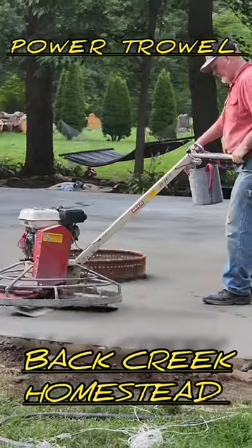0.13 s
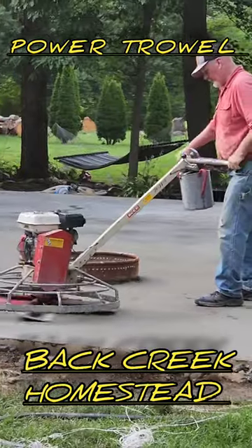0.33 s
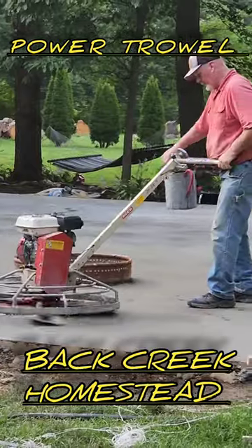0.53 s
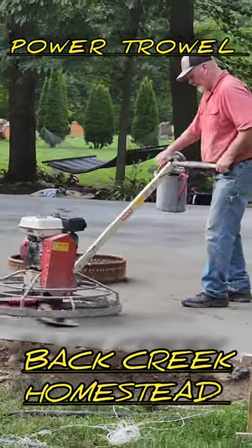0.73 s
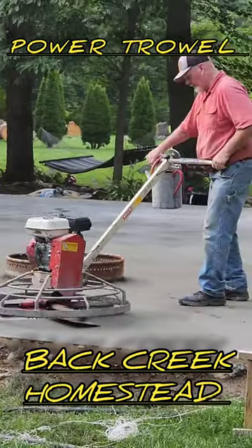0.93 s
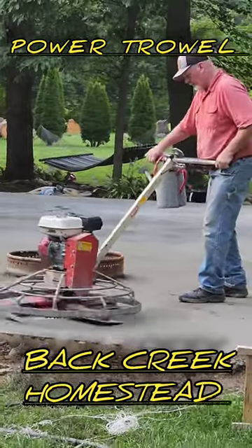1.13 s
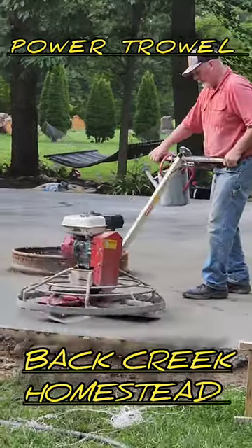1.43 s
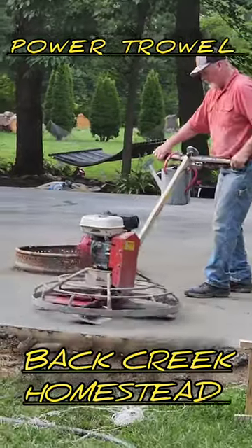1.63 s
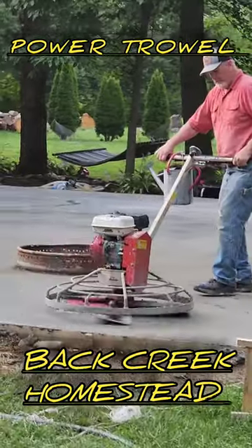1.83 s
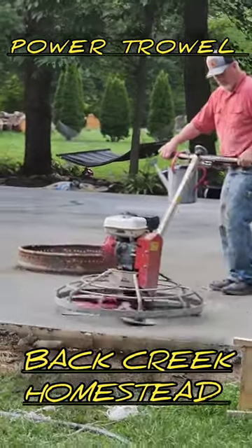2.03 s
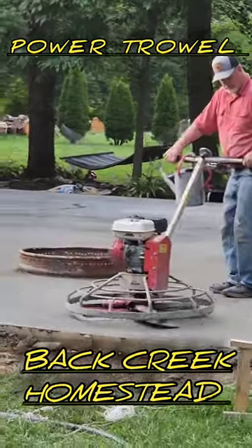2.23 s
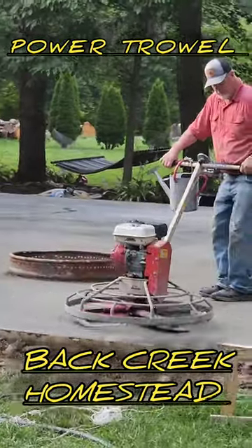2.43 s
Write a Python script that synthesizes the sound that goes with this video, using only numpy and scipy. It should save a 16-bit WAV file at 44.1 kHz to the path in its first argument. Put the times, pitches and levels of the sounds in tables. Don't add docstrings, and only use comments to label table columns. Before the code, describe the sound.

A one-cylinder petrol engine drones loudly and steadily a few metres away outdoors, its muffler tone shifting as the machine turns; steel blades rasp over wet concrete with gritty crackle and scattered clanks, on a nearly overloaded phone microphone.

```python
import sys
import numpy as np
from scipy import signal
from scipy.fft import rfft, irfft
from scipy.io import wavfile
from scipy.ndimage import uniform_filter1d

SR = 44100
rng = np.random.default_rng(int(sys.argv[2]) if len(sys.argv) > 2 else 0)


def invert_db(level):
    return 10 ** (np.asarray(level, dtype=float) / 20)


def generate_wav(signal):
    frames = np.transpose(np.atleast_2d(signal))
    scaled = np.clip(frames, -1, 1) * 32767
    pcm = np.round(scaled).astype(np.int16)
    wavfile.write(sys.argv[1], SR, pcm)


N = 114219
T = np.arange(N) / SR

# start_s, firing_rate_hz, muffler_turned_away (0-1)
ENGINE = [
    (.07, 31.4, .02),
    (.3, 31.42, .02),
    (.47, 31.75, .05),
    (.6, 31.6, .1),
    (1.25, 31.55, .55),
    (1.4, 31.32, .7),
    (1.8, 31.15, .97),
    (2.59, 31.02, .98),
]


def evened(x):
    return x / np.sqrt(np.mean(x ** 2) + 1e-20)


def read(points, hz):
    f, value = np.transpose(points)
    return np.interp(np.log(hz + 1), np.log(f + 1), value)


def curve(table, t, axis=1):
    return np.interp(t, np.array(table)[:, 0], np.array(table)[:, axis])


def turns():
    first_turn = .703
    return first_turn + np.cumsum(curve(ENGINE, T)) / SR


def exhaust():
    exhaust_db, uneven_db, jitter_cycles = -12, .85, .002
    # harmonic_number, level_db
    facing = [(1, -15), (2, -8), (3, -14), (4, -12), (5, -1), (6, 0), (7, -12), (8, -4), (9, -7), (10, -8),
              (11, -10), (12, -19), (13, -22), (14, -18), (15, -22), (16, -23)]
    # harmonic_number, level_db
    turned = [(1, -20), (2, -12), (3, -17), (4, -20), (5, 0), (6, -7), (7, -15), (8, -7), (9, -7),
              (10, -16), (11, -14), (12, -18), (13, -28), (14, -22), (15, -21), (16, -23)]
    muffler_echoes = [
        [(-1., .292), (.57, .581)],
        [(-1.05, .292), (.62, .581)],
    ]

    at = np.flatnonzero(np.diff(np.floor(turns())) > 0)
    chance = rng.standard_normal((len(at), 2))
    late = (jitter_cycles * SR / 31.4 * chance[:, 0]).astype(int)
    blows = np.zeros(N + 8192)
    blows[at + late] = -invert_db(uneven_db * chance[:, 1])
    spectrum = rfft(blows)
    hz = np.fft.rfftfreq(len(blows), 1 / SR)

    away = np.clip(curve(ENGINE, T, axis=2), 0, 1)
    rates = (ENGINE[3][1], ENGINE[6][1])
    out = 0
    for share, table, rate, echoes in zip((1 - away, away), (facing, turned), rates, muffler_echoes):
        k, db = np.transpose(table)
        n = hz / rate
        shape = np.interp(n, k, db)
        shape = shape - 30 * np.log2(np.maximum(n / k[-1], 1))
        shape = shape + 12 * np.log2(np.clip(n, .05, 1))
        echo = 1 + sum(g * np.exp(-2j * np.pi * n * d) for g, d in echoes)
        phase = np.exp(1j * np.angle(echo))
        heard = irfft(spectrum * invert_db(shape) * phase, len(blows))[:N]
        out = out + share * evened(heard)
    return invert_db(exhaust_db) * evened(out)


def pressure(t):
    rise_s = 0.0094
    # start_s, pressure_db
    lean = [(.07, 0.5), (.5, -2.5), (.9, 1), (1.4, -0.46), (1.75, -0.5), (2.2, 0.7), (2.58, 4)]
    # start_s, surge_db, fade_s
    catches = [(.163, 17, 0.0075), (0.247, 7.5, 0.055), (0.389, 7, 0.039), (.688, 3.5, .04),
               (.775, 8, 0.0077), (.8, 2.5, 0.07), (.92, 3, 0.045), (1.07, 2.5, 0.14), (1.262, 5.5, 0.018),
               (1.371, 9, 0.028), (1.42, 2.5, 0.12), (1.501, 3, 0.12), (1.685, 1.5, 0.07), (1.79, 5, 0.084),
               (1.905, 3.5, 0.15), (2.031, 3, .05), (2.25, 3, .02), (2.35, 2, 0.037), (2.45, 1, 0.02),
               (2.55, -2.5, .03)]
    out = curve(lean, t)
    for s, db, fade in catches:
        since = np.maximum(t - s, 0)
        out = out + db * np.minimum(since / rise_s, 1) * np.exp(-(since / fade) ** 2)
    return out


def colour(hz):
    # pitch_hz, level_db (per Hz)
    scrape = [(30, -20), (165, -17), (600, -18.5), (1010, -23.5), (2830, -22), (4800, -28.5), (6500, -36.5),
              (16000, -31)]
    # pitch_hz, width_hz, level_db
    rings = [(454, 150, -2.5), (704, 230, 5), (1060, 85, -1.5), (1232, 220, 5.5), (1615, 260, 6.5),
             (2226, 240, 5), (2780, 150, -5), (4330, 770, 12.5), (7360, 550, 7), (10170, 1200, 2),
             (12400, 1200, 3.5), (15400, 590, 2)]
    return read(scrape, hz) + sum(db / (1 + (2 * (hz - f) / w) ** 2) for f, w, db in rings)


def causal(db):
    c = irfft(np.log(invert_db(db)))
    c[1:len(c) // 2] *= 2
    c[len(c) // 2 + 1:] = 0
    return irfft(np.exp(rfft(c)))[:len(c) // 2]


def rasp():
    rasp_db, patch_db, flicker_db = -14.5, 1.8, 0.96
    puff_db, puff_turn = .75, .75
    # pitch_hz, share (ratio)
    follow = [(200, .05), (1000, 0.18), (4000, 0.61), (10000, 1.03)]
    hz = np.fft.rfftfreq(256, 1 / SR)
    steel = causal(colour(np.fft.rfftfreq(8192, 1 / SR)))
    noise = rng.standard_normal((N + 4096, 2)).T
    noise = signal.fftconvolve(noise, steel[None], axes=1)[:, 4096:N + 4096]
    _, t, z = signal.stft(noise, SR, nperseg=256, noverlap=192)

    patches = rng.standard_normal((len(t), 129)).T
    patches = uniform_filter1d(patches, size=3, axis=0)
    patches = evened(uniform_filter1d(patches, size=24, axis=1))
    rates_hz = np.geomspace(5, 60, 30)
    flicker = evened(sum(np.sin(2 * np.pi * (f * t + rng.random())) / np.sqrt(f) for f in rates_hz))
    puff = puff_db * np.cos(2 * np.pi * (np.interp(t, T, turns()) - puff_turn))

    swell = read(follow, hz)[:, None] * (pressure(t) + flicker_db * flicker)
    z = z * invert_db(swell + patch_db * patches + puff)
    out = signal.istft(z, SR, nperseg=256, noverlap=192)[1][:, :N]
    return invert_db(rasp_db) * evened(out)


def grit():
    grit_per_s, grit_db, spread_db, kinds = 380, -26.5, 3.5, 12
    size = invert_db(spread_db * np.minimum(rng.exponential(1, N), 4))
    size = size * (rng.random(N) < invert_db(pressure(T)) * grit_per_s / SR)
    kind = rng.integers(0, kinds, N)
    snaps = rng.standard_normal((kinds, 2, 120)) * np.exp(-np.arange(120) / 25)
    out = 0
    for k in range(kinds):
        out = out + signal.oaconvolve((size * (kind == k))[None], snaps[k], axes=1)[:, :N]
    hz = np.fft.rfftfreq(2048, 1 / SR)
    steel = causal(colour(hz) + 3 * np.log2(np.clip(hz / 4000, .02, 4)))
    return invert_db(grit_db) * evened(signal.oaconvolve(out, steel[None], axes=1)[:, :N])


def clanks():
    t60_s, clank_db, rise_s, rattle_depth = .06, -7, 0.00033, .8
    # start_s, level_db, pitch_hz
    knocks = [
        (.093, -18, 2160),
        (.695, -7.5, 4330),
        (1.201, -13, 2250),
        (1.423, -6.5, 2980),
        (1.534, -18, 1810),
        (1.812, -13, 2430),
        (1.435, -12.5, 822),
        (1.54, -16, 640),
        (1.97, -12.5, 722),
        (2.3, -42, 646),
    ]
    # pitch_share (ratio to the ring pitch), level_db
    partials = [(.57, -4), (.8, -3.5), (1., 6.5), (1.12, 2), (1.43, -9)]
    out = np.zeros(N + 6000)
    t = np.arange(6000) / SR
    spread = rng.uniform(.9, 1.1, (len(knocks), 8))
    for (s, db, hz), detune in zip(knocks, spread):
        ring = 0
        for k, (share, partial_db) in enumerate(partials):
            bend = detune[k] if share != 1 else 1
            ring = ring + invert_db(partial_db) * np.sin(2 * np.pi * hz * share * bend * t)
        i = round(s * SR)
        out[i:i + 6000] += invert_db(db + clank_db - 60 * t / t60_s) * np.minimum(t / rise_s, 1) * ring
    rattle = evened(uniform_filter1d(rng.standard_normal(N), size=150))
    return out[:N] * (1 + rattle_depth * rattle)


def hum():
    hum_hz, hum_db, width_hz = 113, -25.5, 3
    r = np.exp(-np.pi * width_hz / SR)
    waver_hz = signal.lfilter([1 - r], [1, -r], rng.standard_normal(N)) * 60
    return invert_db(hum_db) * np.sin(2 * np.pi * np.cumsum(hum_hz + waver_hz) / SR)


def ports(near, apart):
    # pitch_hz, likeness (0-1)
    same = [(300, .97), (690, .86), (1050, .84), (5500, .76), (6600, .32), (7300, .52), (12000, .58),
            (15500, .45)]
    # pitch_hz, lead_rad
    lead = [(300, -.2), (700, 0), (2200, -.6), (4100, -.3), (6500, .9), (6900, -1), (8300, -2.2),
            (12500, -3)]
    # pitch_hz, balance_db
    balance = [(60, 1), (280, -1.3), (520, 4), (3000, -2.5), (4400, -11), (5500, 0), (6900, 16), (8800, 6)]
    hz = np.fft.rfftfreq(N, 1 / SR)
    like = np.clip(read(same, hz), 0, 1)
    shared = np.sqrt((1 + like) / 2) * rfft(near)
    unrelated = np.sqrt((1 - like) / 2) * rfft(apart)
    half = invert_db(read(balance, hz) / 2) * np.exp(.5j * read(lead, hz))
    even = np.sqrt(2 / (abs(half) ** 2 + abs(half) ** -2))
    return irfft(np.array([(shared + unrelated) * half, (shared - unrelated) / half]) * even, N)


def scene():
    blades = rasp() + grit()
    return ports(exhaust() + hum() + clanks() + blades[0], blades[1])


def roll_off(x):
    return signal.sosfilt(signal.butter(12, 17060, fs=SR, output="sos"), x)


def record(dry):
    knee, ceiling, edge_hz = .75, .96, 15780
    start_s, settle_s, settle_db, click_s = .0592, .0645, -12, .0012
    room = ceiling - knee
    over = np.maximum(abs(dry) - knee, 0)
    x = np.sign(dry) * (np.minimum(abs(dry), knee) + room * np.tanh(over / room))
    x = irfft(rfft(x) * (np.fft.rfftfreq(N, 1 / SR) < edge_hz), N)
    muted = (T > start_s + click_s) & (T < settle_s)
    opening = np.clip((T - start_s) / 0.0002, 0, 1)
    return roll_off(x * opening * invert_db(settle_db * muted))


dry = scene()
out = record(dry)
generate_wav(out)
```